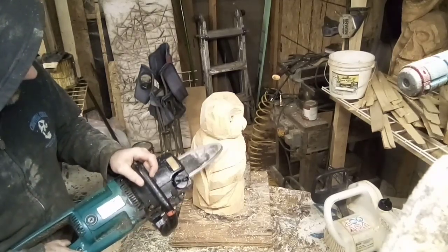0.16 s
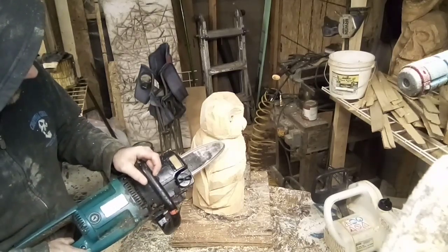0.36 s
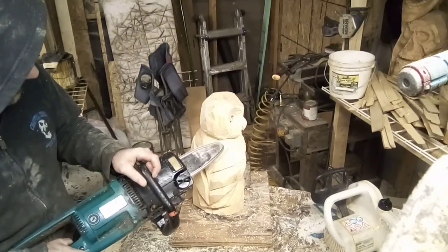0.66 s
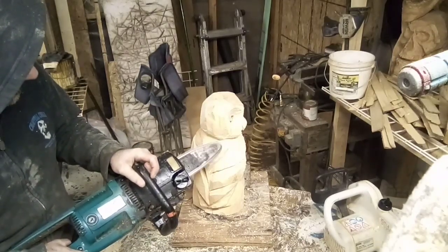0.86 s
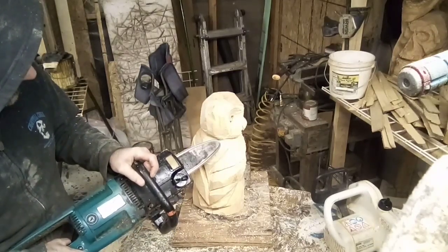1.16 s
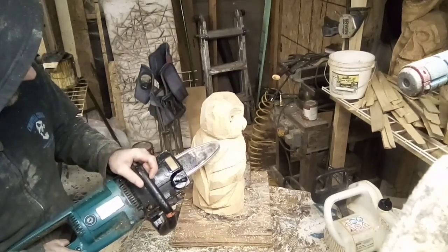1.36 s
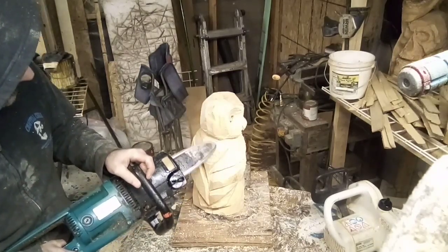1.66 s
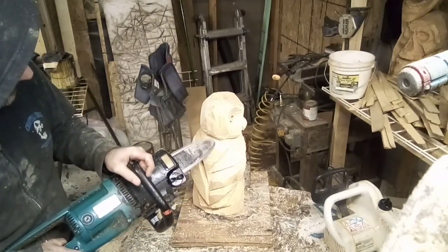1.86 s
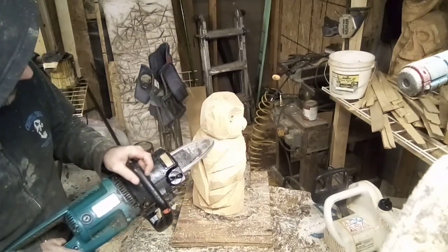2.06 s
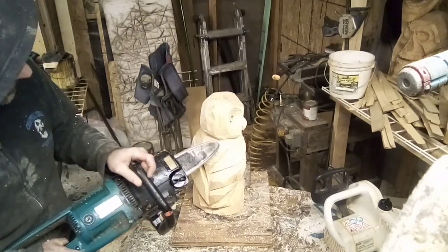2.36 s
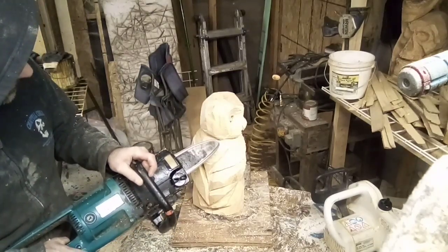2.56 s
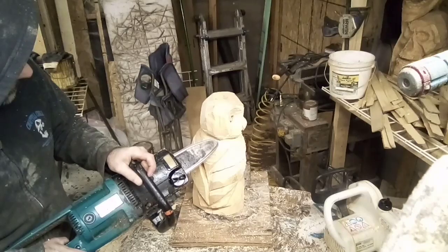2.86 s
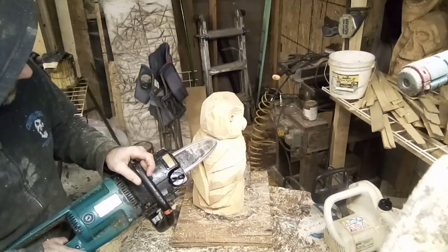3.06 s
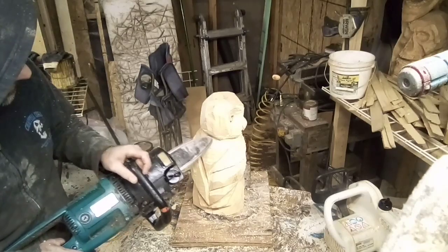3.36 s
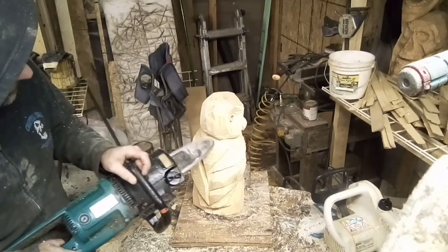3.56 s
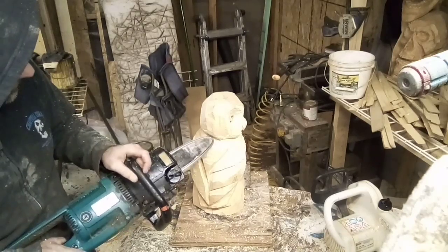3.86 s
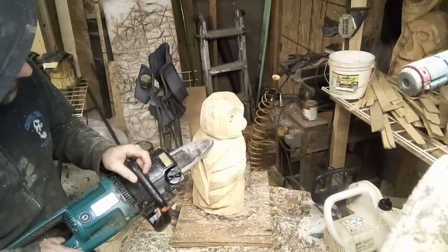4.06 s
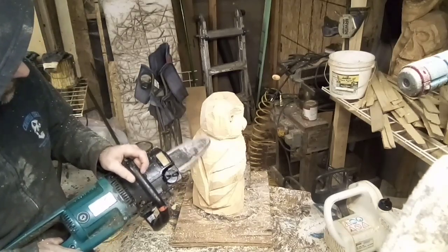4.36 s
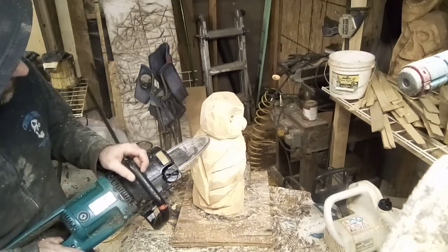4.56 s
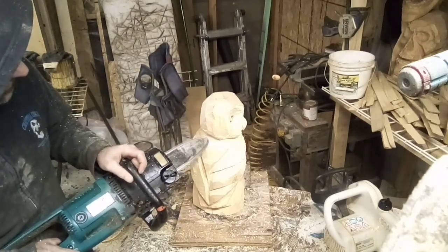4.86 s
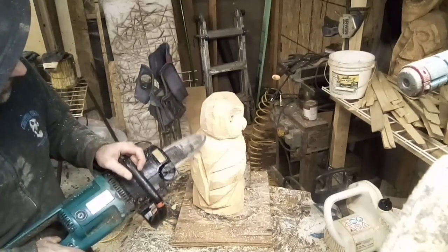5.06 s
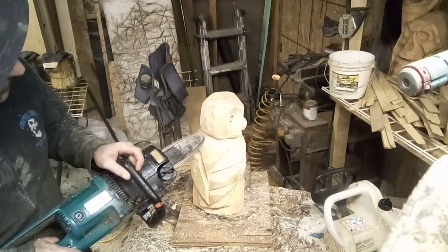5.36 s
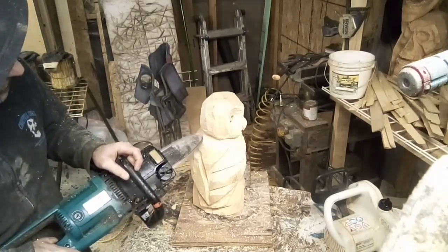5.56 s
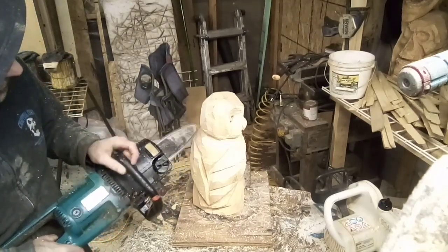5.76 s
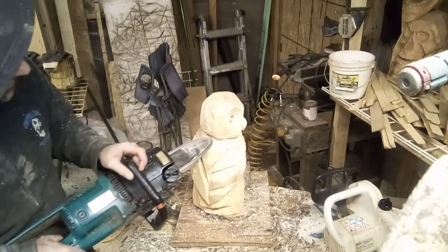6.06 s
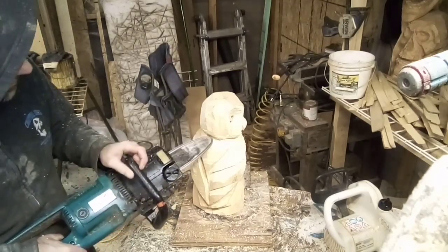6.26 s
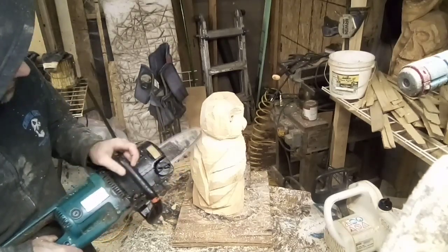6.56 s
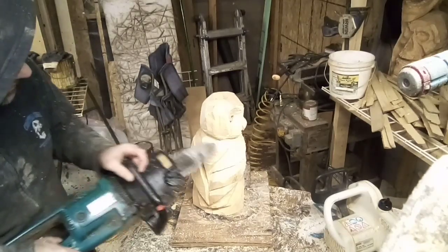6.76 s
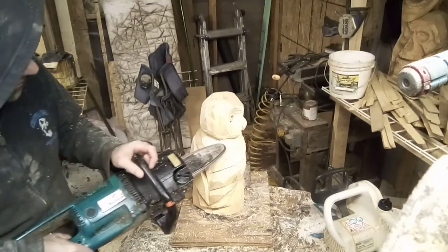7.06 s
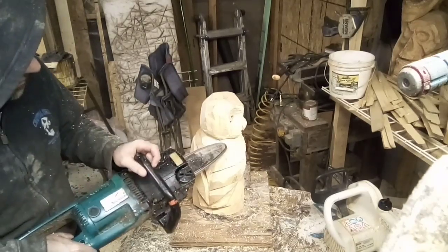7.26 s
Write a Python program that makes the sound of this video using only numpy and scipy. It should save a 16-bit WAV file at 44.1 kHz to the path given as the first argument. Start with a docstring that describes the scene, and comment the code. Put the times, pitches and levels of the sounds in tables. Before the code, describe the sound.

Continuous electric saw noise: rough rushing air and bright chain hiss over a nearly constant motor whine, heard close in a cluttered shed.

```python
"""A chainsaw whine at full speed sounds throughout, together with rough drive tones, rushing air and chain rattle.
The electric saw runs in a small workshop, its bar tip skimming a wooden carving.
Whine and drive are sines locked to the shaft; air and chain are noise shaped by the housing's resonances.
Drifting echoes color the rush as the saw shifts in the hands; thin hiss lies on top. One microphone."""
import sys
import numpy as np
from scipy import signal
from scipy.fft import rfft, irfft, next_fast_len
from scipy.io import wavfile
from scipy.ndimage import uniform_filter1d, map_coordinates

SR = 44100
rng = np.random.default_rng(int(sys.argv[2]) if len(sys.argv) > 2 else 0)


def int16_out(signal):
    """Quantize to a 16-bit WAV file."""
    q = np.round(np.clip(np.atleast_2d(signal).T, -1, 1) * 32767)
    wavfile.write(sys.argv[1], SR, q.astype(np.int16))


N = 326781
TOP_HZ = 15500
CRUISE_HZ = 389.5  # usual shaft speed, turns per second
AIR_DB, CHAIN_DB = -26.5, -24  # rms levels around which air and chain run


def amp(db):
    """Decibels to gain."""
    return 10 ** (np.asarray(db) / 20)


def unit(x):
    """Scaled to rms 1."""
    return x / np.sqrt(np.mean(x ** 2) + 1e-20)


def along(points, hz):
    """(Hz, value) points interpolated on a log frequency axis."""
    point_hz, value = np.transpose(points)
    return np.interp(np.log(hz + 1), np.log(point_hz + 1), value)


def wobble(knots_per_s):
    """Smooth random curve through normally distributed knots."""
    knots = rng.standard_normal(int(N * knots_per_s / SR) + 4)
    return map_coordinates(knots, [np.arange(N) * knots_per_s / SR])


def filtered(x, response):
    """x times a response of frequency, by zero-padded FFT."""
    m = next_fast_len(N + SR // 2)
    spectrum = rfft(x, m) * response(np.fft.rfftfreq(m, 1 / SR))
    return irfft(spectrum, m)[:N]


def bell(hz, centre_hz, width_hz):
    """Bump of height 1, width taken at half height."""
    return .5 ** ((2 * (hz - centre_hz) / width_hz) ** 2)


# motor shaft, sagging whenever the chain drags: time_s, speed_turns_per_s
SHAFT_SPEED = [(0, 384.9), (0.5, 390.1), (1.35, 389.0), (2.05, 387.4), (2.5, 391.1), (3.05, 390.1),
               (3.42, 387.8), (3.8, 390.6), (4.5, 389.0), (5.65, 388.3), (6.15, 391.5), (6.58, 389.6),
               (7.41, 393.6)]


def shaft_speed():
    """Shaft speed per sample, turns per second; every shaft-locked sound follows it."""
    time_s, turns_per_s = np.transpose(SHAFT_SPEED)
    return np.interp(np.arange(N) / SR, time_s, turns_per_s)


# clean shaft orders: order_per_turn, cruise_level_db, rise_db_per_turn_per_s, drift_db_per_s
WHINE_ORDERS = [(1, -42, -0.17, 0), (2, -43, 1, 0.45), (3, -40, 0.2, 0.1), (12, -52, 1, 2.5),
                (13, -50, 1, 1), (16, -48, -1, -0.5)]


def motor(speed, turns, flutter_db, sway_db):
    """The whine: clean shaft orders whose levels follow the speed; those above the first are less steady."""
    from_middle_s = (np.arange(N) - N / 2) / SR
    sound = np.zeros(N)
    for order, cruise_db, rise_db, drift_db in WHINE_ORDERS:
        unsteady_db = flutter_db * wobble(22) + sway_db * wobble(3.13)
        if order == 1:
            unsteady_db *= .5
        level_db = cruise_db + rise_db * (speed - CRUISE_HZ) + drift_db * from_middle_s + unsteady_db
        sound += amp(level_db) * np.sin(2 * np.pi * round(order) * turns)
    return np.sqrt(2) * sound  # levels are rms


# rough gear and sprocket tones: order_per_turn, level_db, flutter_db, phase_wander_rad
DRIVE_TONES = [(1.457, -52.5, 2.5, .45), (1.688, -51, 0.5, 0.33), (2.311, -45.5, 5, 0.23),
               (2.606, -50, -1, 1), (2.915, -46, 4.5, 0.57), (3.425, -51, 6, 0.46), (3.6, -45.5, 7, 0.73),
               (4.455, -49.5, 4, 1.1), (5.02, -48.5, 8, 1.1), (5.27, -51, -5, 0.9)]


def drive(turns):
    """Gears and sprocket add fluttering, phase-wandering tones that follow the motor's speed."""
    sound = np.zeros(N)
    for order, level_db, flutter_db, wander_rad in DRIVE_TONES:
        flutter = (wobble(2.92) + wobble(22)) / np.sqrt(2)
        strength = unit(amp(flutter_db * flutter))
        wander = wander_rad * (wobble(9) + .5 * wobble(50))
        sound += amp(level_db) * strength * np.sin(2 * np.pi * order * turns + wander)
    return np.sqrt(2) * sound


# broad relative color of air and chain: frequency_hz, density_db
RUSH_COLOR = [(40, -36), (170, -26), (330, -17), (530, -11), (660, -3), (1500, 1), (2900, -4.0),
              (4700, -1.65), (6600, -4.5), (8000, -20.5), (10200, -23), (11200, -20), (13800, -25)]
# resonances and hollows of housing, bar and bench: centre_hz, width_hz, gain_db
BODY_RESONANCES = [(241, 38, 4.5), (359, 15, 3), (391, 37, -7.5), (404.6, 125, 7), (583, 22, 4),
                   (652, 39, 5.5), (720, 19, -2), (867, 58, 2), (1006, 14, 3), (1062, 26, -4),
                   (1103, 33, -1), (1182, 94, 3.5), (1258, 153, -4), (1364, 35, -1.5), (1390, 17, -2),
                   (1777, 74, 8.5), (1810, 170, -8), (1960, 230, 3.5), (2165, 200, -2), (2265, 30, 3),
                   (2470, 61, -2), (3560, 560, 1.4), (3952, 62, 6.5), (4440, 39, 5), (4720, 116, 3.5),
                   (5070, 70, 4.5), (5330, 38, 4.5), (6300, 91, 4)]


def housing(hz):
    """Relative gain with which the saw radiates each frequency."""
    resonance_db = sum(db * bell(hz, centre_hz, width_hz) for centre_hz, width_hz, db in BODY_RESONANCES)
    return amp(along(RUSH_COLOR, hz) + resonance_db)


def air(split_hz):
    """The cooling fan's turbulence: noise filling the resonances below split_hz."""
    turbulence = rng.standard_normal(N)
    flow = filtered(turbulence, lambda hz: housing(hz) / np.sqrt(1 + (hz / split_hz) ** 8))
    return amp(AIR_DB) * unit(flow)


def chain(turns, split_hz, links_per_turn, scatter_db, tick_share, buzz):
    """Links tick over sprocket and bar amid sliding hiss; the chain slaps and the mains pulses the torque."""
    link_phase = links_per_turn * turns + .3 * wobble(400)
    hits = np.flatnonzero(np.diff(np.floor(link_phase)))
    ticks = np.zeros(N)
    ticks[hits] = amp(scatter_db * rng.standard_normal(len(hits)))
    scrape_s = 0.00084
    contact = signal.lfilter([1], [1, -np.exp(-1 / (scrape_s * SR))], ticks)
    # tick_share: part of the noise power that pulses with the links
    power = 1 - tick_share + tick_share * unit(contact) ** 2
    scrape = rng.standard_normal(N) * np.sqrt(power)
    rattle = filtered(scrape, lambda hz: housing(hz) / np.sqrt(1 + (split_hz / (hz + 1)) ** 8))
    torque = np.cos(2 * np.pi * 120 * np.arange(N) / SR)  # 120 Hz
    level_db = CHAIN_DB + 0.41 * wobble(18) + 0.47 * wobble(45)
    return amp(level_db) * (1 + buzz * torque) * unit(rattle)


def patchy(x, depth_db):
    """The rubbing shifts from band to band: slow patches of random gain."""
    z = signal.stft(x, nperseg=512)[2]
    field = uniform_filter1d(rng.standard_normal(z.shape), size=7, axis=0)  # over frequency
    field = uniform_filter1d(field, size=36, axis=1)  # over time
    return signal.istft(z * amp(depth_db * unit(field)), nperseg=512)[1][:N]


def workshop(x, echo_db, sway_s, count):
    """Echoes off bench and walls; their paths drift as the saw moves, so the color shimmers."""
    n = np.arange(N)
    echoes = np.zeros(N)
    for delay_s in rng.uniform(.003, .03, count):
        path_samples = SR * (delay_s + sway_s * wobble(2))
        echoes += rng.choice([-1, 1]) * map_coordinates(x, [n - path_samples], mode="mirror")
    mixed = x + amp(echo_db) * echoes / np.sqrt(count)
    return mixed / np.sqrt(1 + amp(echo_db) ** 2)


# relative color of the thin top hiss: frequency_hz, density_db
FIZZ_COLOR = [(12500, -52), (13700, -22), (14100, -10), (14500, -3), (14780, 1), (14950, -2), (15250, -2),
              (15450, 0)]


def fizz(level_db, shimmer_db):
    """A thin, shimmering band of filtered noise lies above the chain's sound."""
    hiss = filtered(rng.standard_normal(N), lambda hz: amp(along(FIZZ_COLOR, hz)) * (hz < TOP_HZ))
    return amp(level_db + shimmer_db * wobble(20)) * unit(hiss)


def scene():
    """The saw, alike in both channels; the shaft speed drives whine, gears and chain."""
    speed = shaft_speed()
    turns = np.cumsum(speed) / SR
    split_hz = 2650  # air dominates below, chain above
    whine = motor(speed, turns, flutter_db=1.0, sway_db=0.6)
    gears = drive(turns)
    links = chain(turns, split_hz, links_per_turn=1.5, scatter_db=2.0, tick_share=0.17, buzz=.02)
    rush = air(split_hz) + patchy(links, depth_db=.5)
    room_rush = workshop(rush, echo_db=-12.5, sway_s=.00012, count=8)
    saw = whine + gears + room_rush + fizz(level_db=-37.5, shimmer_db=.5)
    return np.array([saw, saw])


def record(dry):
    """The recorder keeps nothing above its band limit."""
    return np.array([filtered(channel, lambda hz: hz < TOP_HZ) for channel in dry])


dry = scene()
out = record(dry)
int16_out(out)
```